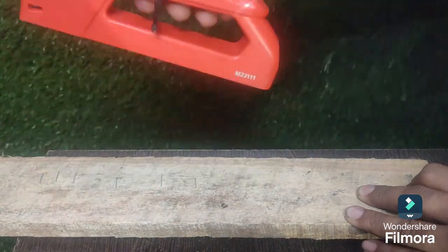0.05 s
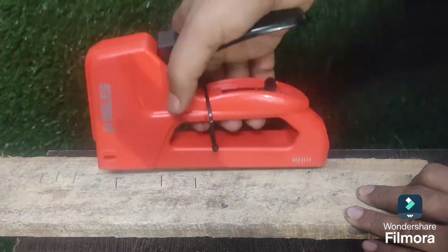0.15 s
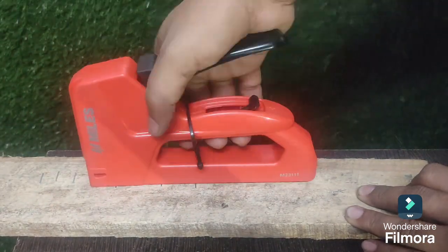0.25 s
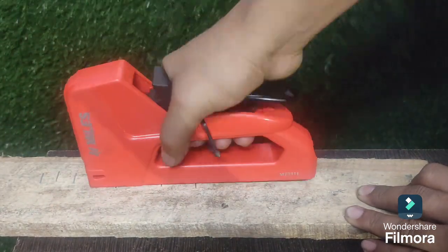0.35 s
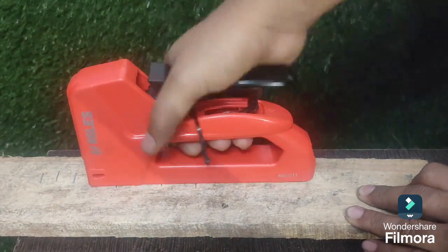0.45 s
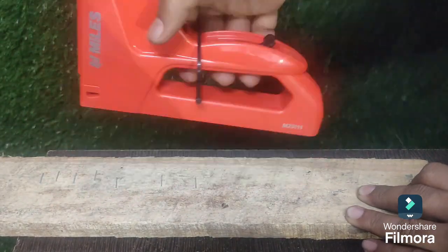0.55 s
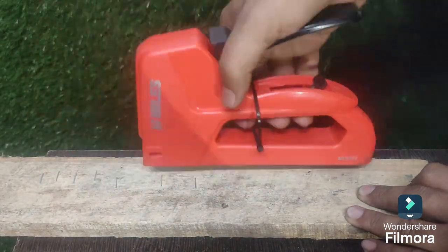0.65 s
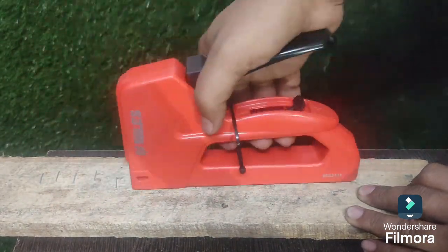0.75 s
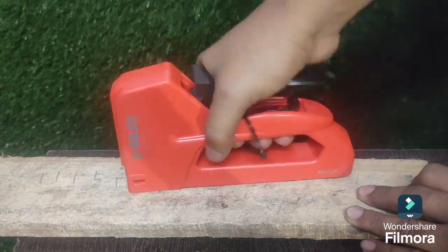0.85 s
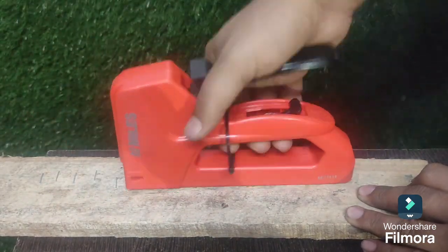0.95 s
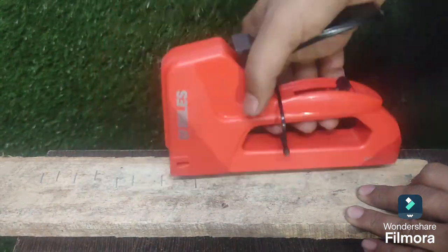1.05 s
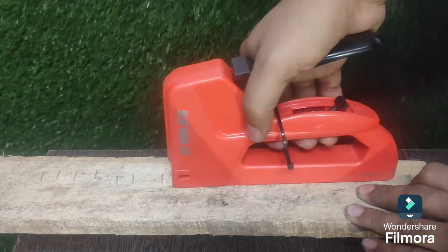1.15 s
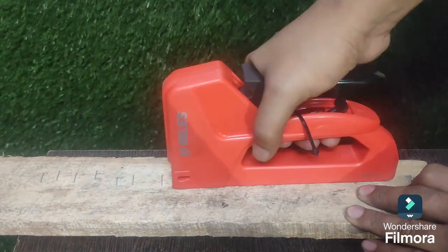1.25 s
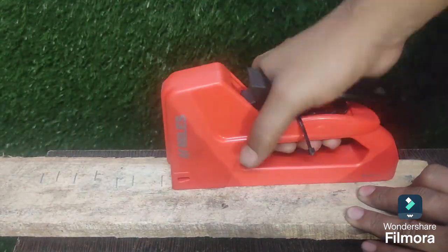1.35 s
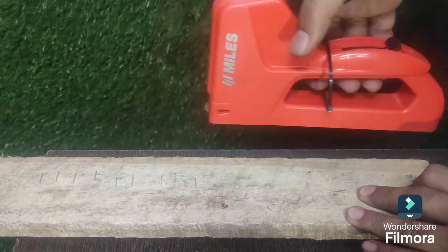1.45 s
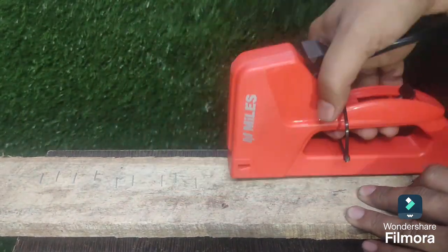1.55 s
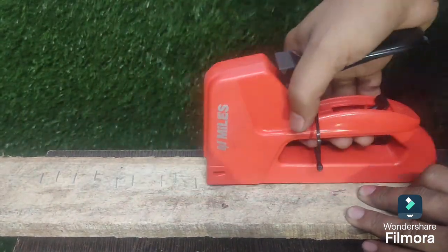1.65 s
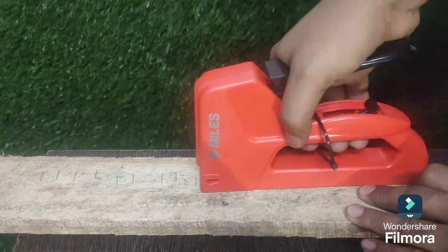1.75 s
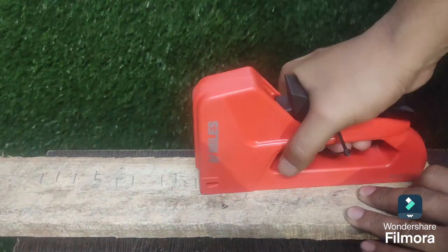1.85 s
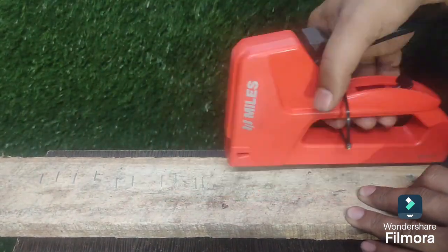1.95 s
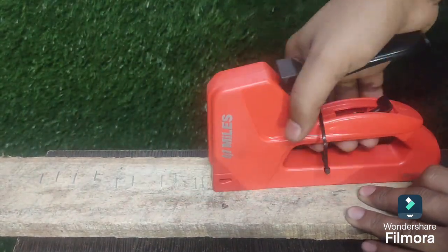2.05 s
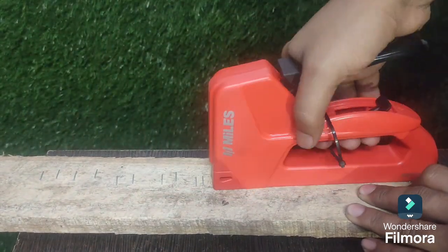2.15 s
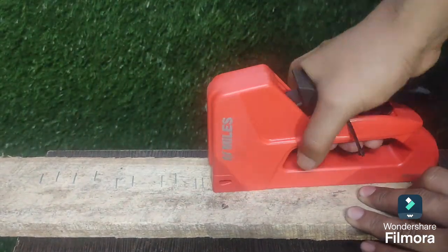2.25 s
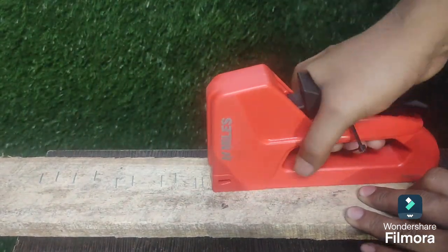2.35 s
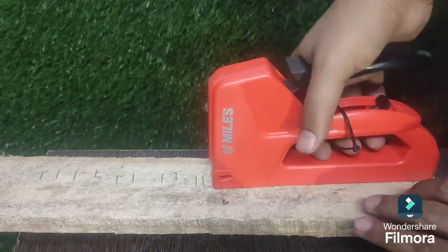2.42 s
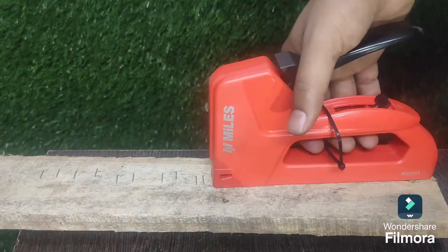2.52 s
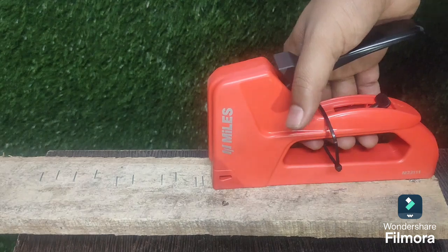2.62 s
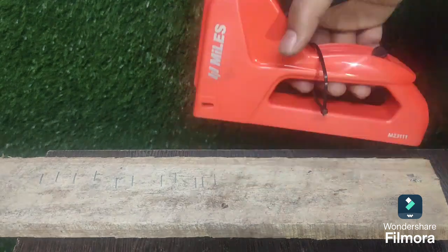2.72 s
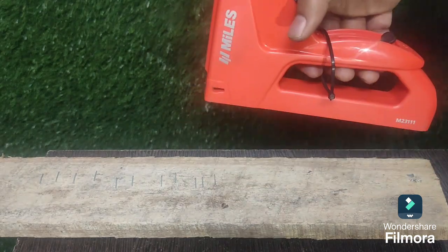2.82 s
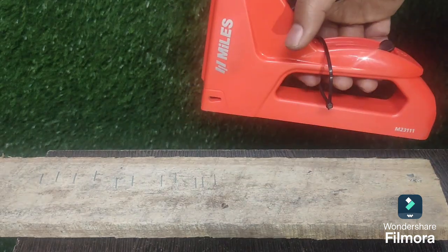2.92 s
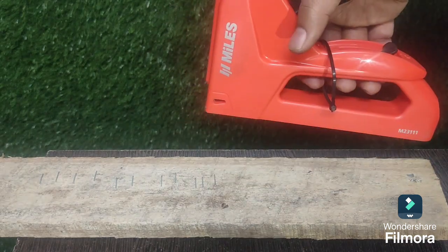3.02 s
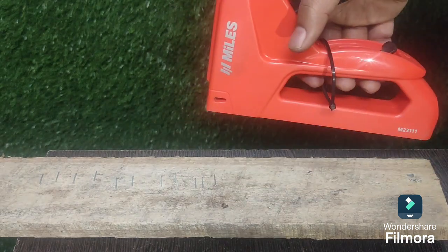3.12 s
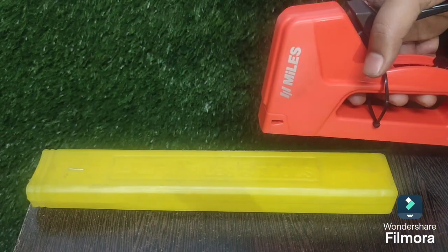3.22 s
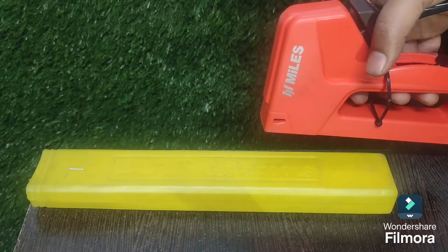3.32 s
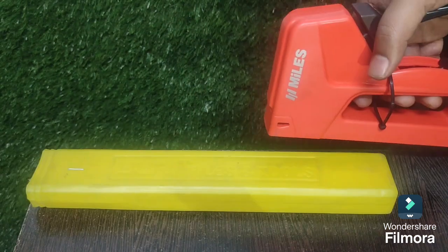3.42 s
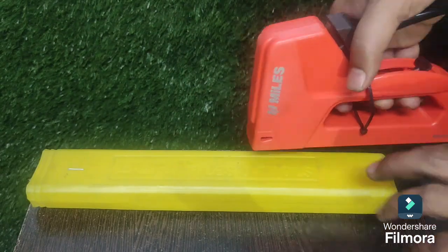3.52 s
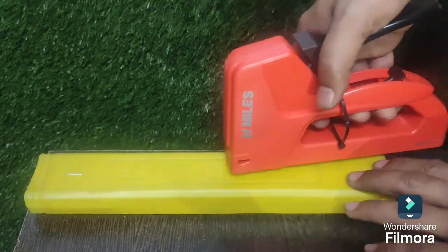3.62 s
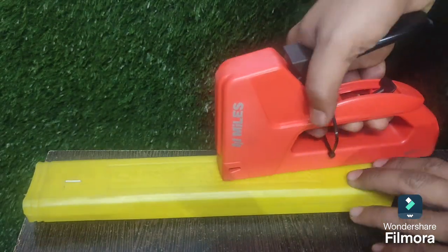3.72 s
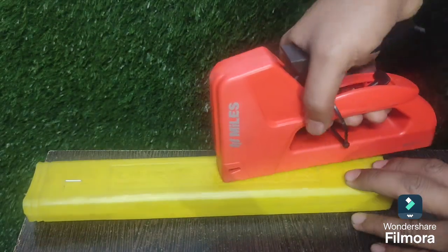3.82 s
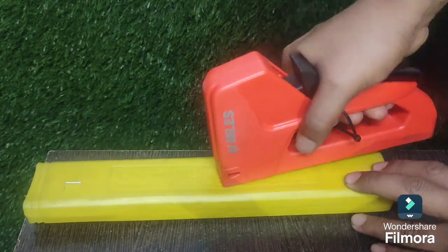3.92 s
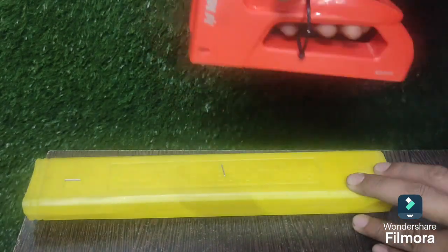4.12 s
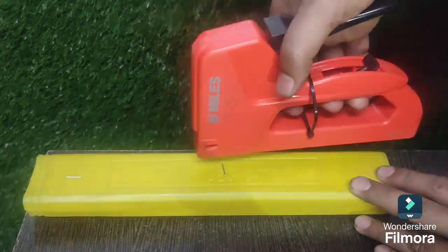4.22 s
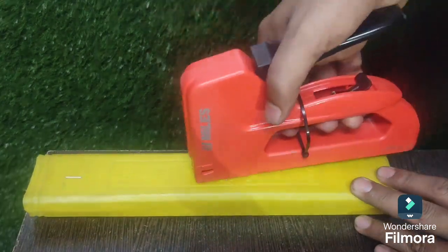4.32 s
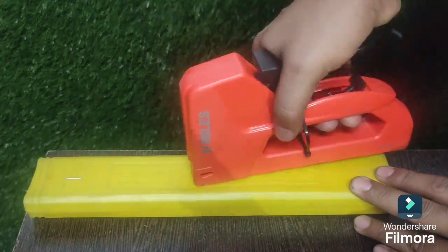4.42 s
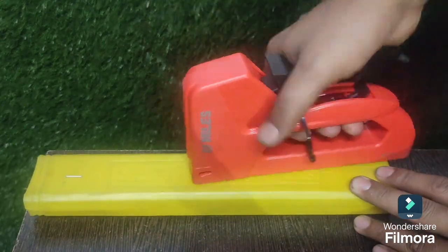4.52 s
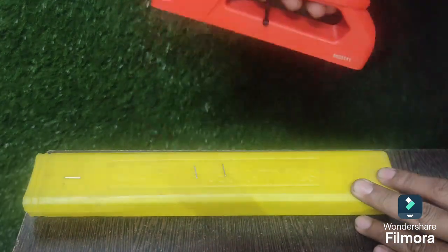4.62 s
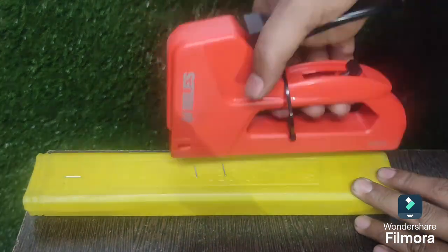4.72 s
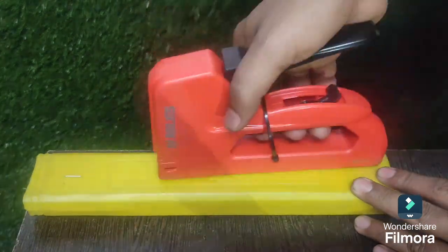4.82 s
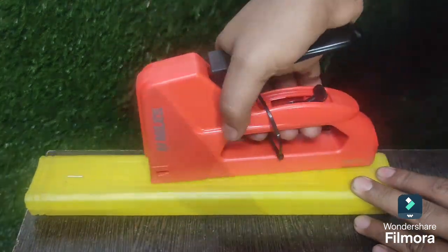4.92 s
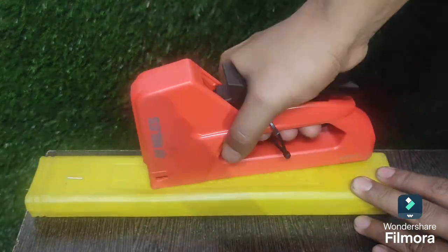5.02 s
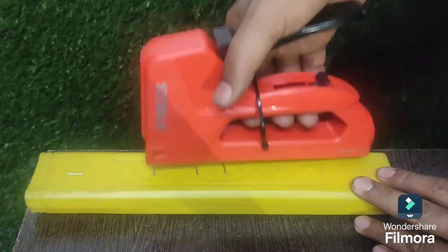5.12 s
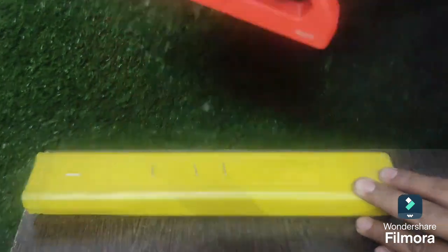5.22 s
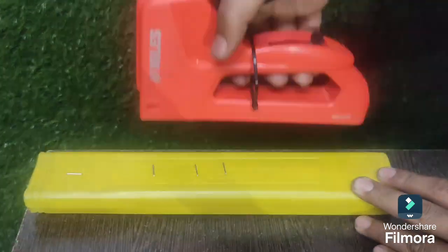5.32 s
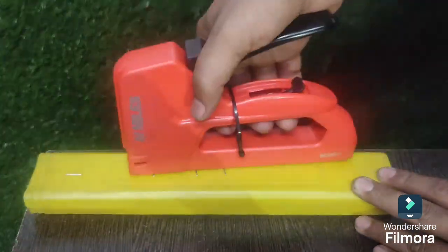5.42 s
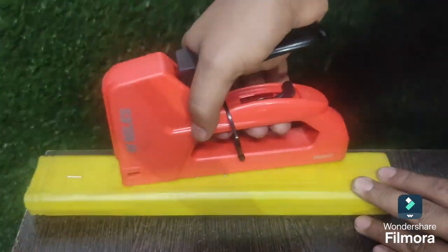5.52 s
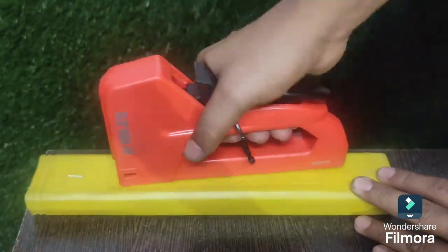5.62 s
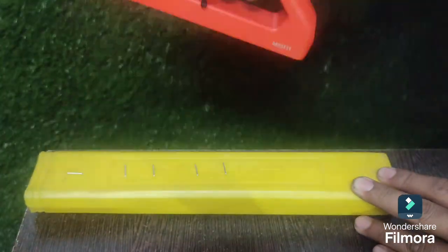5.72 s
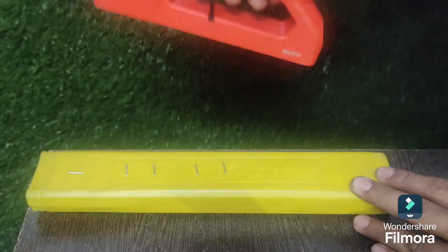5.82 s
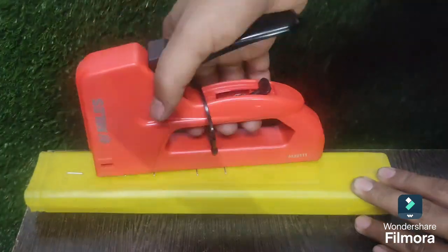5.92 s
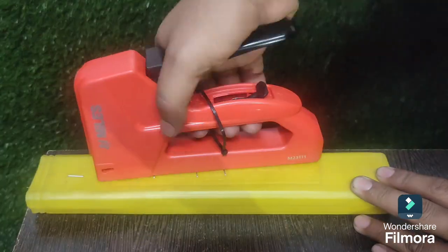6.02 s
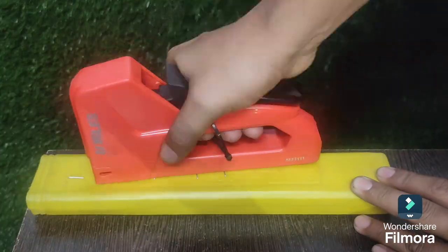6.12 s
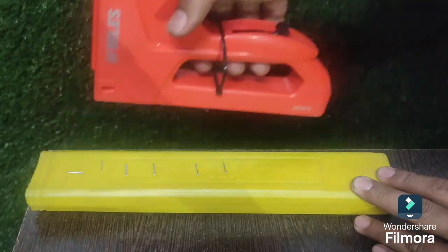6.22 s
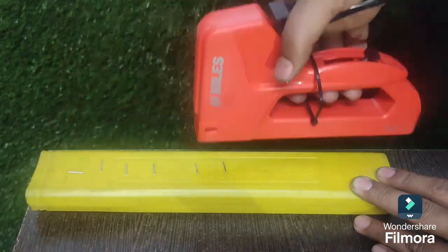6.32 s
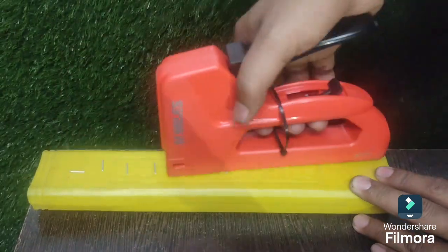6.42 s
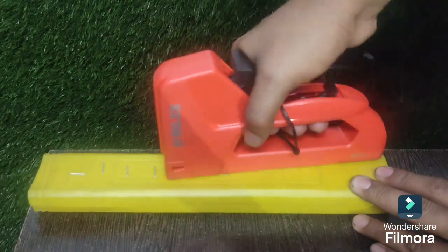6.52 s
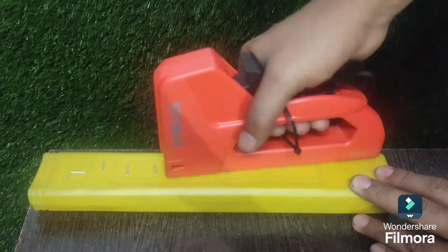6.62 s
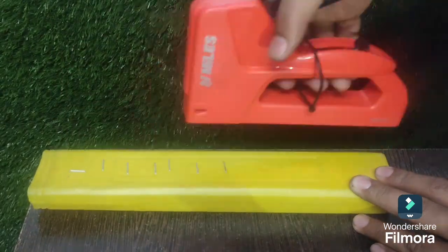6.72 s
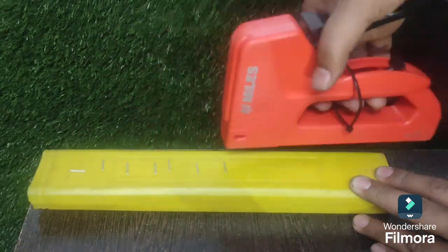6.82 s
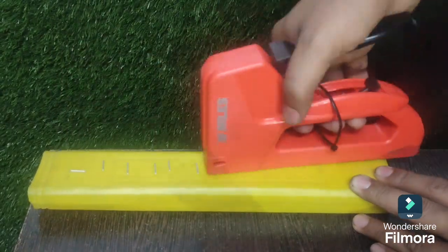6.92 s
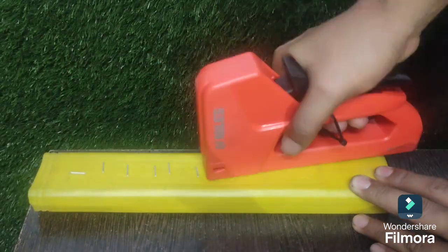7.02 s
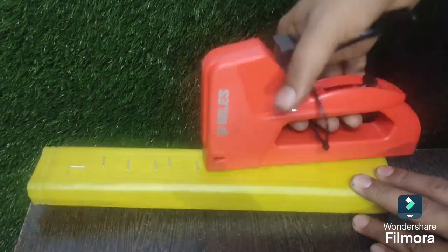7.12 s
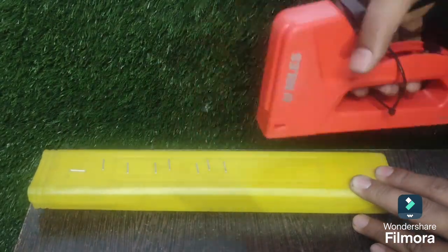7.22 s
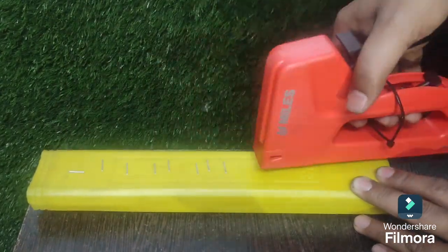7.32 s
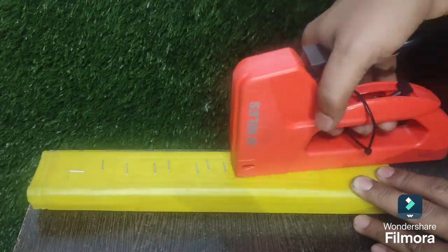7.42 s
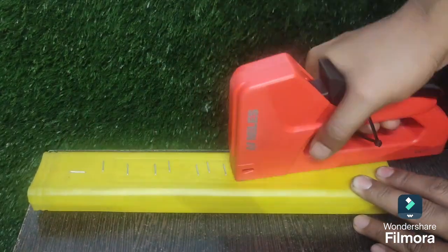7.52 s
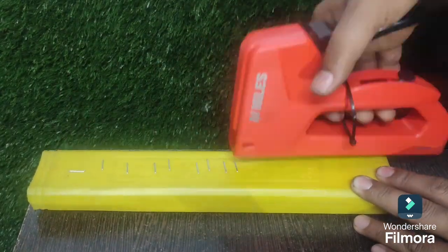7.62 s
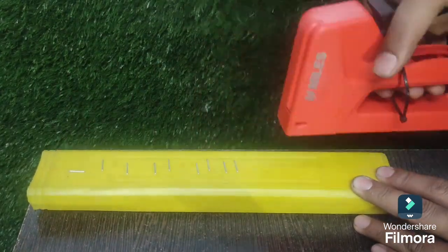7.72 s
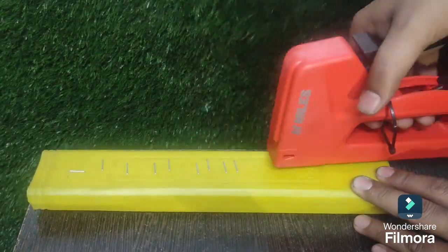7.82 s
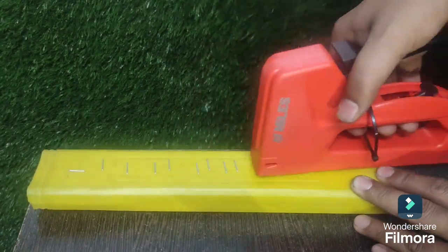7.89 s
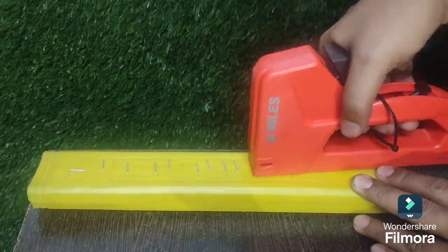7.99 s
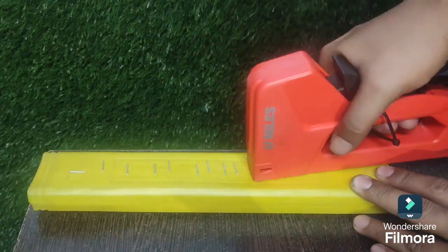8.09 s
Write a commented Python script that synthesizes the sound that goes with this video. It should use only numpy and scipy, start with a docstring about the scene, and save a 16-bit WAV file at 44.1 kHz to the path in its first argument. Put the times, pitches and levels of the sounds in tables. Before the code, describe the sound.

Sharp, ringing staple gun shots about twice a second, first into a plank, then into a plastic bar, over a light breeze.

```python
"""Outdoors in a yard, light breeze, phone microphone close to a spring staple gun. The gun fires six times
into a plank and, after a brief silence, eight times into a hollow plastic bar. Each shot rings the steel,
the workpiece and the table and jolts the phone; the lever clicks before and after. Every click is smeared
into a short swell that differs left and right. Wind on the ports, sleeve rustle and a far murmur behind."""
import sys
import numpy as np
from scipy import signal
from scipy.fft import rfft, irfft, next_fast_len
from scipy.io import wavfile
from scipy.ndimage import uniform_filter1d, map_coordinates

SR = 44100
rng = np.random.default_rng(int(sys.argv[2]) if len(sys.argv) > 2 else 0)


def wav_record(signal):
    """Record a signal, one row per channel, as 16-bit PCM in the file named by sys.argv[1]."""
    frames = np.transpose(np.atleast_2d(signal))
    bounded = np.clip(frames, -1, 1)
    # unit amplitude maps onto the largest positive 16-bit level
    quanta = np.round(bounded * 32767).astype(np.int16)
    wavfile.write(sys.argv[1], SR, quanta)


N = 359415

# shots: t/s, base swell length/s, steel snap/dB, workpiece knock/dB, table thump/dB, phone jolt/dB
SHOTS = [(0.007, .041, -15, -27, -27.5, -34), (0.53, 0.046, -16.5, -38, -31, -58.5),
         (1.004, .051, -14, -26.5, -29.5, -24), (1.417, 0.058, -15.5, -32, -32.5, -31),
         (1.951, 0.046, -15.5, -32, -27.5, -56.5), (2.412, .056, -17.5, -33.5, -31.5, -31),
         (4.029, .052, -15.5, -29, -30, -23.5), (4.586, .048, -17, -33.5, -34.5, -22),
         (5.144, .053, -18, -37.5, -33, -31.5), (5.709, 0.045, -15.5, -30.5, -21.5, -26.5),
         (6.218, .043, -18, -42.5, -37.5, -29.5), (6.678, .039, -16.5, -36, -35, -38),
         (7.149, 0.046, -15.5, -24.5, -25, -8), (7.638, .039, -16, -27.5, -33, -28.5)]
# steel ticks as the gun is squeezed and moved: t/s, level/dB, fullness/dB
TICKS = [(0.449, -51.5, 0.5), (0.472, -35, 3.5), (0.971, -54, 4), (1.377, -46.5, -0.5), (1.917, -46.5, 0.5),
         (2.366, -48.5, 2.5), (3.043, -65, 3), (3.208, -60, 6.5), (3.641, -67, 10), (3.766, -66.5, 12.5),
         (3.888, -64, 8), (3.981, -47, -4.5), (4.18, -64.5, -4), (4.35, -66, -4), (4.788, -57, 3.5),
         (4.886, -57, 0.5), (5.02, -56.5, -7), (5.1, -42.5, -3), (5.667, -46, -11), (6.12, -60.5, -17.5),
         (6.184, -43.5, -3), (6.333, -48, 0), (6.385, -58.5, 5.5), (6.478, -66.5, 7), (6.641, -47, -3),
         (6.83, -57.5, 2), (6.95, -55, 1.5), (7.072, -54, -20.5), (7.118, -46.5, -14), (7.4, -58, -1),
         (7.6, -47, -7.5), (7.86, -64, -4), (8.145, -56.5, 0)]
# lever returns, soft bumps on the workpiece, mainspring twangs, hand and sleeve: t/s, level/dB
RETURNS = [(0.081, -39), (0.612, -38), (1.082, -37.5), (1.501, -39), (2.044, -40), (2.556, -41),
           (4.108, -39), (4.657, -45), (5.235, -47), (5.79, -43), (6.3, -43.5), (6.789, -45),
           (7.238, -39.5), (7.726, -46.5)]
BUMPS = [(1.222, -53), (2.757, -51.5), (4.681, -52.5), (6.385, -60.5), (6.545, -56), (7.009, -54.5)]
TWANGS = [(.05, -52), (.115, -60), (.645, -64), (1.124, -57), (1.15, -63), (3.235, -63), (7.547, -56),
          (7.57, -58)]
HANDLING = [(0.0, -82), (0.18, -74), (0.45, -78), (0.59, -67.5), (1.77, -73), (1.95, -71.5), (3.15, -74.5),
            (3.9, -58), (4.13, -80), (4.36, -74), (4.54, -67), (5.11, -55.5), (5.4, -62), (6.11, -67.5),
            (6.33, -57.5), (7.17, -63), (7.38, -63.5), (7.6, -59), (7.9, -69), (8.15, -89)]
# wind at the microphone: t/s, buffeting/dB, breeze/dB, gust/dB
WIND = [(0.0, -47.5, -46, -57), (0.34, -40.5, -46, -65.5), (0.77, -50.5, -45, -64.5),
        (1.11, -42, -51, -63.5), (1.45, -46.5, -43, -59), (1.7, -45, -53, -71), (2.0, -39.5, -49, -65.5),
        (2.34, -47.5, -54, -68), (2.47, -45.5, -52, -58.5), (2.79, -44, -43.5, -68),
        (3.04, -43, -54.5, -65), (3.22, -44.5, -47.5, -69), (3.9, -50.5, -50.5, -70),
        (4.31, -52, -53, -71.5), (4.61, -46, -48.5, -55.5), (4.95, -50, -52, -70.5),
        (5.85, -43, -47.5, -59), (6.01, -45.5, -52, -65.5), (6.24, -56.5, -52, -60),
        (6.38, -37, -49, -54.5), (6.65, -43.5, -55, -77), (6.9, -41, -49, -62), (7.15, -45.5, -47.5, -58),
        (7.38, -48, -53.5, -62.5), (7.67, -46, -50, -62), (8.15, -42, -47, -61)]
# resonances of the gun's parts: f/Hz, width/Hz, level/dB
SHELL_MODES = [(792, 520, -7.5), (860, 90, -6), (1131, 3600, 2.5), (1530, 59, 4.5), (1756, 1600, 1)]
FRAME_MODES = [(2200, 300, -3), (2500, 250, -1), (3300, 350, 0), (3650, 300, -1), (3200, 2500, -3),
               (4250, 350, -2)]
BLADE_MODES = [(4750, 500, -3), (5300, 400, -2), (6140, 180, 1), (6500, 400, -1), (7000, 500, -1),
               (6200, 4000, -3)]
LEVER_MODES = [(745, 200, 0), (1150, 900, -6), (1530, 130, -2)]
SPRING_MODES = [(2760, 95, -2.5), (3000, 80, -6), (3200, 71, -4.5), (3460, 45, -2), (5740, 60, -6.5)]
# resonances under the gun; the higher notes ring with its nose pressed down: f/Hz, width/Hz, level/dB
TABLE_MODES = [(41.7, 21, -6.5), (118, 91, -15.5)]
PLANK_MODES = [(190, 320, 1), (315, 41, -2.5), (427, 510, -4)]
BAR_MODES = [(259.1, 140, -2.2), (308, 52, -2.5), (466, 91, -3.9)]
PLANK_NOTES = [(1490, 90, -8), (3010, 120, -5), (3650, 200, -5), (4680, 250, -4), (6140, 160, 1)]
BAR_NOTES = [(780, 200, 0), (1660, 120, -4), (2490, 170, 0), (3330, 150, -1), (5020, 120, -3)]
# noise spectra of wind, handling and far background: f/Hz, relative level/dB
BUFFET_SPECTRUM = [(7.1, -42.5), (12, -10.5), (32, 7), (90, -8.5), (120, -40), (200, -120)]
BREEZE_SPECTRUM = [(35, -38), (60, -3.5), (134, -4.5), (205, -11), (231, -19.5), (260, -18.5), (340, -50.5),
                   (570, -120)]
GUST_SPECTRUM = [(120, -33.5), (200, -2), (274, -0.5), (307, -8), (650, -20.5), (840, -51.5), (1430, -120)]
RUSTLE_SPECTRUM = [(1290, -50), (2200, -13), (2680, 1), (2980, -4), (3730, -6.5), (6630, 1), (7670, -6.5),
                   (9970, -27.5), (16900, -120)]
MURMUR_SPECTRUM = [(180, -25.5), (300, -2.5), (378, -9.5), (575, -8.5), (888, -16), (1150, -11.5),
                   (1390, -16.5), (1820, -15), (2260, -20), (6430, -22.5), (7670, -29.5), (9970, -56),
                   (16900, -120)]
# decay off the yard walls: f/Hz, t60/s
YARD_DECAY = [(200, 0.18), (2000, 0.19), (7000, 0.25)]
# colour of the two microphone ports: f/Hz, left minus right/dB
PORT_BALANCE = [(60, -1), (120, -2.5), (240, 0.5), (470, 1.5), (930, -0.5), (1840, 1), (3640, 3.5),
                (7220, -6)]
# filter on the mirror image in the treble: f/Hz, gain/dB
MIRROR_GAIN = [(8000, -36), (9500, -25), (12000, -22.5), (15000, -25.5), (15700, -48), (15800, -66.5)]

SHELL_DB, FRAME_DB, NOTES_DB = (-10, -5), (-4.5, -2.5), (-7.5, -6.5)  # over the snap: on plank, on bar
CATCH_LEAD_S, CATCH_DB = .022, -23  # before the shot, over the snap
# over the level of a light contact: workpiece, lever, frame, blade
RETURN_DB, TICK_DB, BUMP_DB = (-7.5, -5, -2, 0), (-28, -16, -7.5, 1.5), (5.5, -8.5, -20.5, -37.5)
GAP_S, FADE_IN_S, FULL_S = 3.2675, 3.305, 3.33  # sound stops, starts to return, is back
BAND_HZ, RATE_HZ, TOP_HZ = 8230, 16000, 15800  # direct band limit, phone sampling rate, mirror limit


def shots():
    """The blade slips its catch and slams a staple home: gun, workpiece and table all ring."""
    t, span, snap_db, knock_db, thump_db, _ = np.transpose(SHOTS)
    shell_db, frame_db, notes_db = [snap_db + np.where(t < GAP_S, *db)
                                    for db in (SHELL_DB, FRAME_DB, NOTES_DB)]
    catch = blurred(t[1:] - CATCH_LEAD_S, snap_db[1:] + CATCH_DB, blur=.036, t60=.017)
    return (ring(catch, FRAME_MODES + BLADE_MODES)
            + ring(blurred(t, thump_db, blur=1.1 * span, t60=.065), TABLE_MODES)
            + workpiece(blurred(t, knock_db, blur=.87 * span, t60=.023), PLANK_MODES, BAR_MODES)
            + workpiece(blurred(t, notes_db, blur=span, t60=.062), PLANK_NOTES, BAR_NOTES)
            + ring(blurred(t, shell_db, blur=1.23 * span, t60=.058), SHELL_MODES)
            + ring(blurred(t, frame_db, blur=1.016 * span, t60=.059), FRAME_MODES)
            + ring(blurred(t, snap_db, blur=1.144 * span, t60=.048), BLADE_MODES))


def workpiece(knock, plank, bar):
    """A knock rings the plank before the silence, the plastic bar after it."""
    gap = round(GAP_S * SR)
    return np.hstack([ring(knock[:, :gap], plank), ring(knock[:, gap:], bar)])


def phone_jolts():
    """Each shot pushes each microphone one way or the other, and it creeps back."""
    t, *_, jolt_db = np.transpose(SHOTS)
    shot_index = np.searchsorted(t[1:] - .1, np.arange(N) / SR)
    angle = rng.uniform(0, 2 * np.pi, len(t))[shot_index]
    return np.array([np.cos(angle), np.sin(angle)]) * swells(t + .006, jolt_db, blur=.03, t60=.28)


def clicks():
    """Light contacts ring gun and workpiece; a fuller tick stirs all but the blade more."""
    contacts = ([(t, *np.add(db, RETURN_DB)) for t, db in RETURNS]
                + [(t, *np.add(db, BUMP_DB)) for t, db in BUMPS]
                + [(t, *(db + np.add(TICK_DB, [full, full, full, 0]))) for t, db, full in TICKS])
    t, knock_db, *parts_db = np.transpose(contacts)
    steel = sum(ring(blurred(t, db, blur=.072, t60=.0067), modes)
                for db, modes in zip(parts_db, (LEVER_MODES, FRAME_MODES, BLADE_MODES)))
    return steel + workpiece(blurred(t, knock_db, blur=.015, t60=.025), PLANK_MODES, BAR_MODES)


def mainspring():
    """The mainspring twangs faintly in a few narrow resonances."""
    return ring(blurred(*np.transpose(TWANGS), blur=.099, t60=.09), SPRING_MODES)


def wind():
    """Air buffets the microphone ports in puffs, partly each port's own and partly shared."""
    buffet_db, breeze_db, gust_db = curves(WIND)
    puffs = amp(1.5 * np.array([wobble(10), wobble(11)]) + 1.5 * wobble(7))
    return (amp(buffet_db) * unit(puffs * rush(BUFFET_SPECTRUM, patchy_db=1.0))
            + amp(breeze_db) * unit(puffs * rush(BREEZE_SPECTRUM, patchy_db=-1.5))
            + amp(gust_db) * unit(puffs * rush(GUST_SPECTRUM, patchy_db=4.5)))


def handling():
    """Close by, skin and sleeve slip in many tiny ticks that merge into a rustle."""
    level_db, = curves(HANDLING)
    when, size = rng.random((2, 450))
    slips = unit(swells(when * N / SR, -2.2 * np.log(size), blur=.065, t60=.01))
    return amp(level_db) * (.5 + .36 * slips) * rush(RUSTLE_SPECTRUM, patchy_db=-1.0)


def yard(x):
    """Nearby walls answer; each frequency dies at its own speed."""
    hz, t, noise = signal.stft(rng.standard_normal((2, SR // 3)), SR, nperseg=256)
    decay = amp(-60 * t / along(YARD_DECAY, hz)[:, None])
    tail = signal.istft(noise * decay, SR, nperseg=256)[1]
    return signal.fftconvolve(x, tail / np.linalg.norm(tail[0]), axes=1)[:, :N]


def far_murmur():
    """The distant outdoors, a steady low-level noise."""
    return amp(-60) * rush(MURMUR_SPECTRUM, patchy_db=1.76)


def swells(times, levels_db, blur, t60):
    """Envelope of blows that die in t60 seconds, each smeared over blur seconds and peaking on its time."""
    tail = amp(-60 * np.arange(round(t60 * SR)) / SR / t60)
    power = np.zeros(N + SR)
    for t, db, span in zip(*np.broadcast_arrays(times, levels_db, blur)):
        swell = signal.fftconvolve(np.hanning(round(span * SR)) ** 2, tail)
        start = SR // 2 + round(t * SR) - swell.argmax()
        power[start:start + len(swell)] += (amp(db) * swell / swell.max()) ** 2
    return np.sqrt(power[SR // 2:][:N])


def blurred(times, levels_db, blur, t60):
    """Clicks smeared into swells of noise, different in each channel."""
    return swells(times, levels_db, blur, t60) * rng.standard_normal((2, N))


def ring(x, modes):
    """x through steep resonances whose powers add, with unit gain for white noise."""
    def response(hz):
        power = sum(amp(2 * db) * ((hz * width) ** 2 / ((f ** 2 - hz ** 2) ** 2 + (hz * width) ** 2)) ** 2
                    for f, width, db in modes)
        return np.sqrt(power / power.mean())
    return filtered(x, response)


def rush(spectrum, patchy_db):
    """Noise of rms 1, unrelated left and right, with shared patches of gain in time and frequency."""
    bins = signal.stft(rng.standard_normal((2, N)), nperseg=512)[2]
    patches = uniform_filter1d(rng.standard_normal(bins.shape[1:]), size=8, axis=0)
    patches = uniform_filter1d(patches, size=5, axis=1)
    noise = signal.istft(bins * amp(patchy_db * unit(patches)), nperseg=512)[1][:, :N]
    return unit(filtered(noise, lambda hz: amp(along(spectrum, hz)) * (hz > 6)))


def wobble(rate):
    """A smooth random curve, rate knots a second."""
    return map_coordinates(rng.standard_normal(int(N * rate / SR) + 4), [np.arange(N) * rate / SR])


def filtered(x, response):
    """x through a frequency response."""
    size = next_fast_len(x.shape[-1] + SR // 4)
    return irfft(rfft(x, size) * response(np.fft.rfftfreq(size, 1 / SR)), size)[..., :x.shape[-1]]


def curves(rows):
    """One value per sample for each column after the time."""
    t, *columns = np.transpose(rows)
    return [np.interp(np.arange(N) / SR, t, column) for column in columns]


def along(points, hz):
    """Points joined on a log frequency axis."""
    f, values = np.transpose(points)
    return np.interp(np.log(hz + 1), np.log(f + 1), values)


def amp(db):
    return 10 ** (np.asarray(db) / 20)


def unit(x):
    return x / np.sqrt(np.mean(x ** 2) + 1e-20)


def scene():
    """The gun up close, a faint answer from the walls, and the air around the microphone."""
    gun = phone_jolts() + shots() + mainspring() + clicks()
    return gun + amp(-35.5) * yard(gun) + wind() + handling() + far_murmur()


def record(dry):
    """Phone microphone: two unequal ports and a faint mirror image from its low sampling rate. Once, the sound
    briefly drops out."""
    t = np.arange(N) / SR
    side = np.array([[.5], [-.5]])
    rolloff = lambda hz: amp(-40 * np.clip((hz - 7300) / 830, 0, 1) ** 3) * (hz < BAND_HZ)
    direct = filtered(dry, lambda hz: amp(side * along(PORT_BALANCE, hz)) * rolloff(hz))
    mirror = filtered(direct * np.cos(2 * np.pi * RATE_HZ * t),
                      lambda hz: amp(along(MIRROR_GAIN, hz)) * (hz > RATE_HZ / 2))
    # the mirror image fades faster than the sound that casts it
    mirror_power = np.abs(uniform_filter1d(mirror ** 2, size=600)) / amp(-49.5) ** 2
    mirror *= np.clip(mirror_power, 0, 1) ** .2
    fade_in = np.clip((t - FADE_IN_S) / (FULL_S - FADE_IN_S), 0, 1) ** 3
    dropout = np.where(t < GAP_S, 1, fade_in)
    return np.clip(filtered((direct + mirror) * dropout, lambda hz: hz < TOP_HZ), -1, 1)


dry = scene()
out = record(dry)
wav_record(out)
```